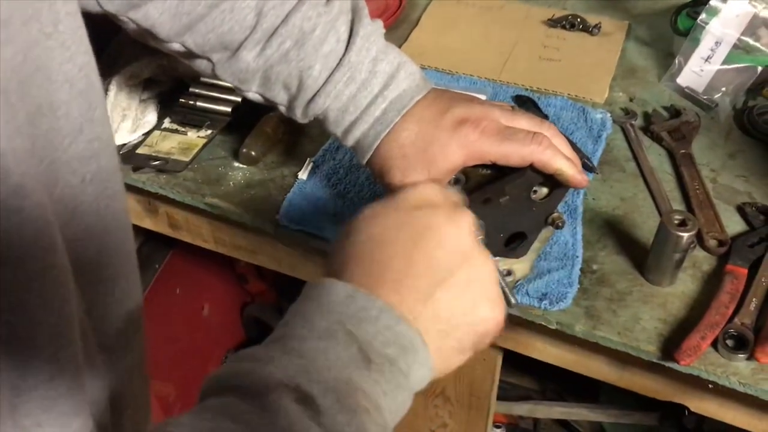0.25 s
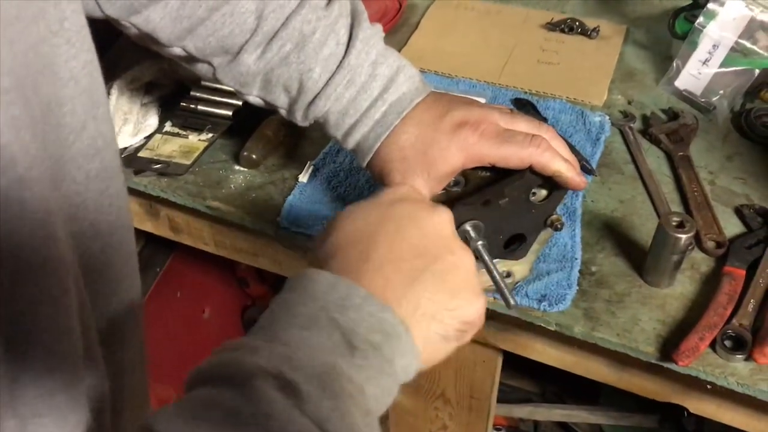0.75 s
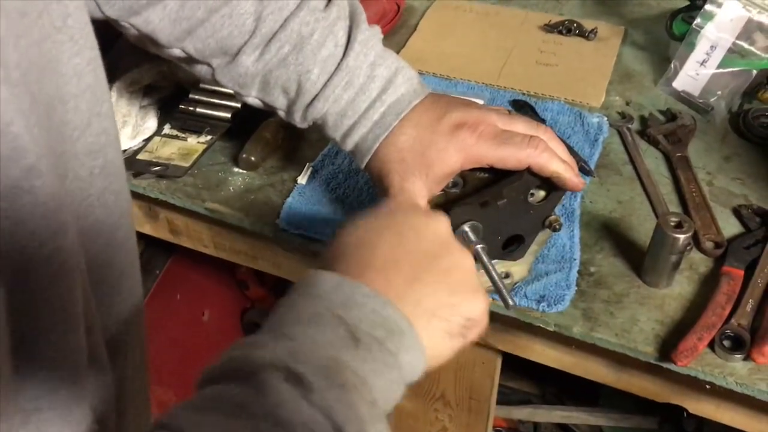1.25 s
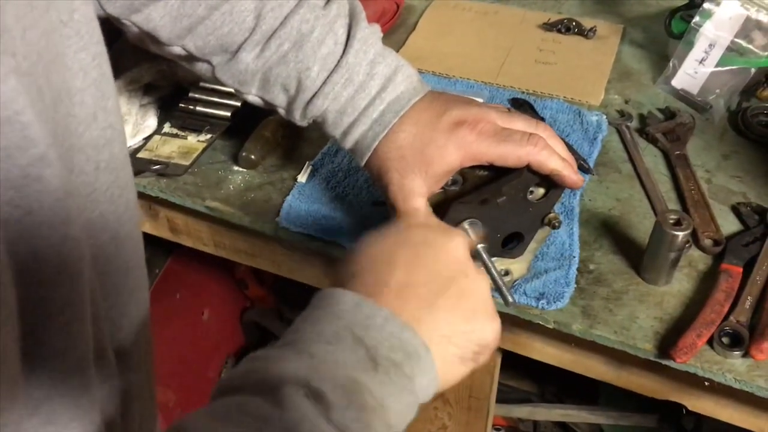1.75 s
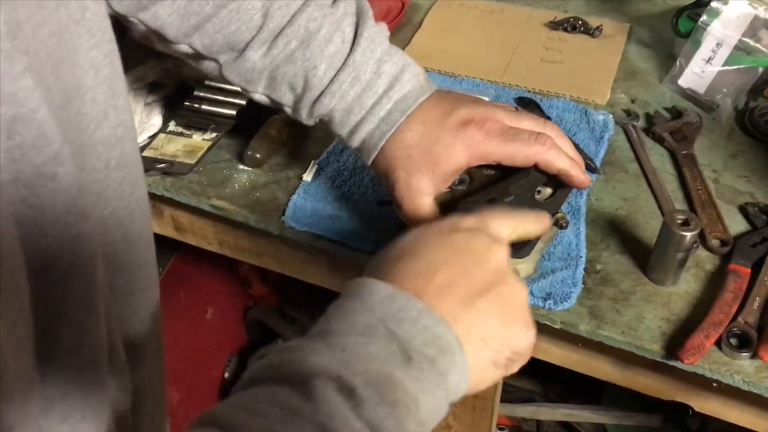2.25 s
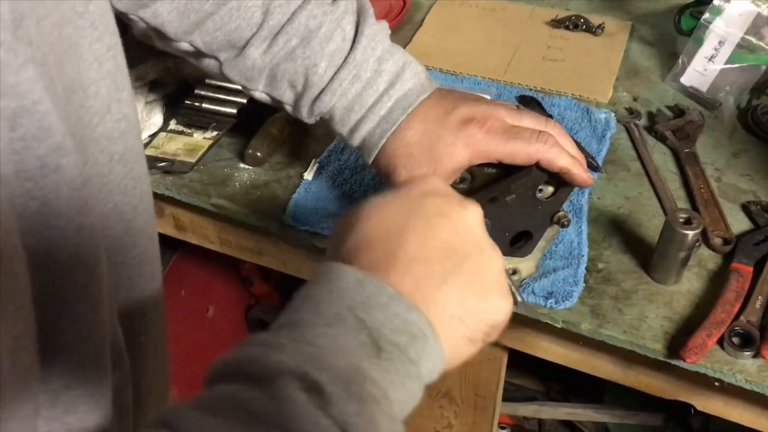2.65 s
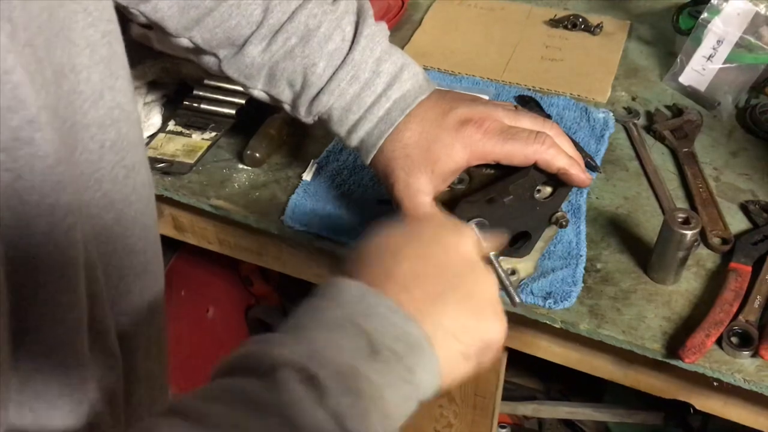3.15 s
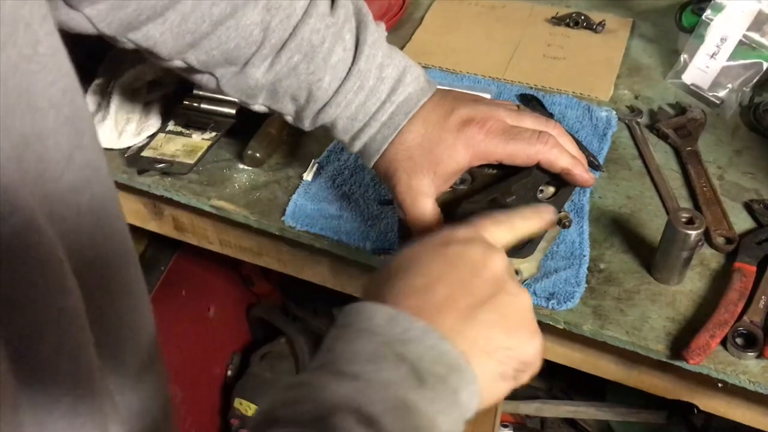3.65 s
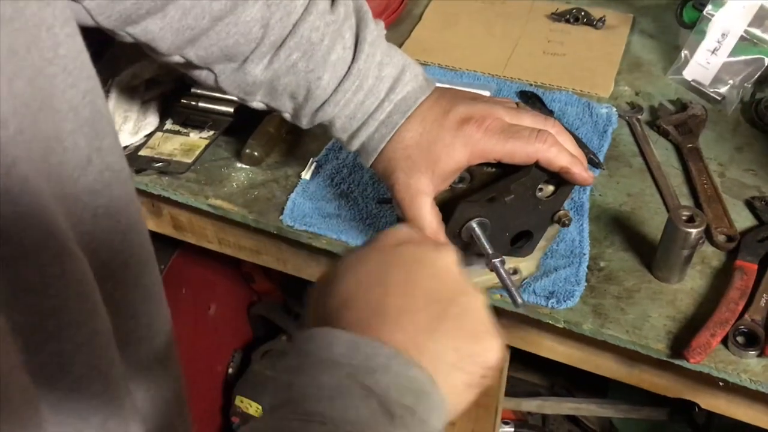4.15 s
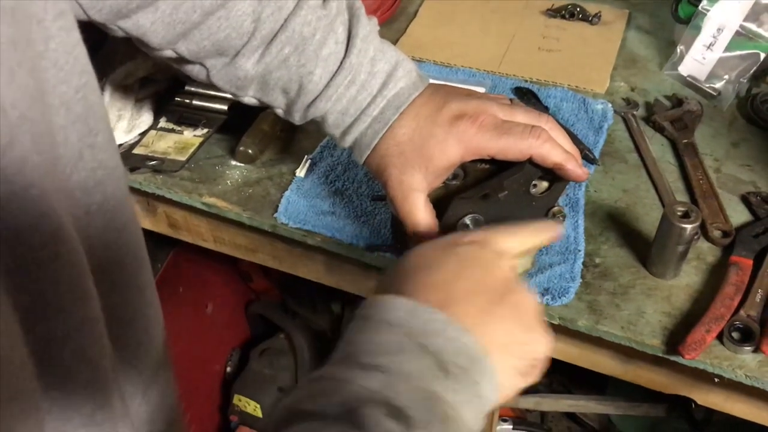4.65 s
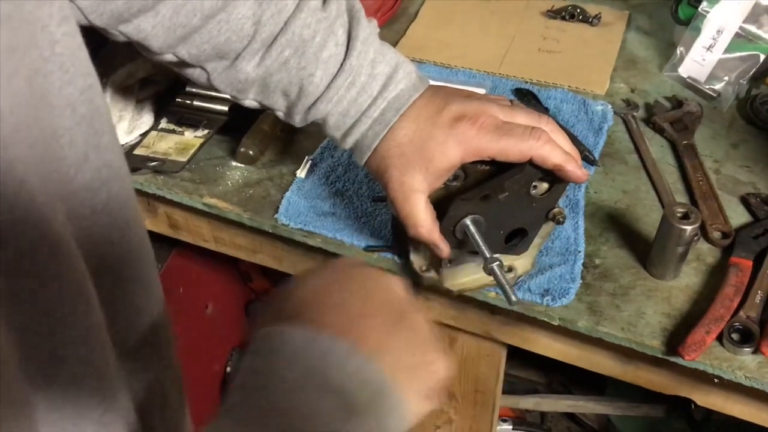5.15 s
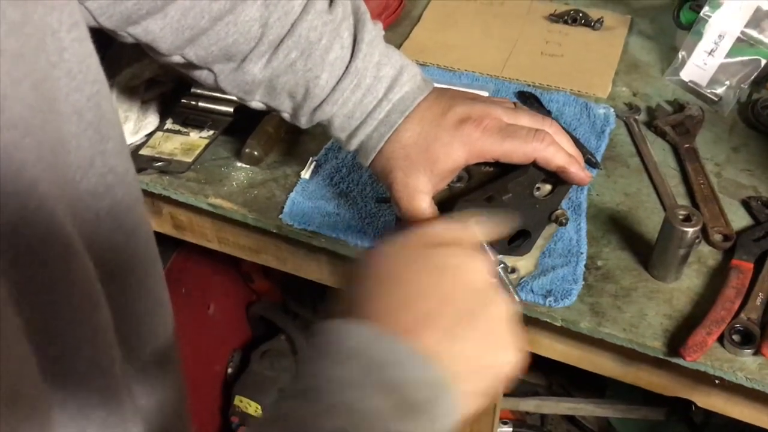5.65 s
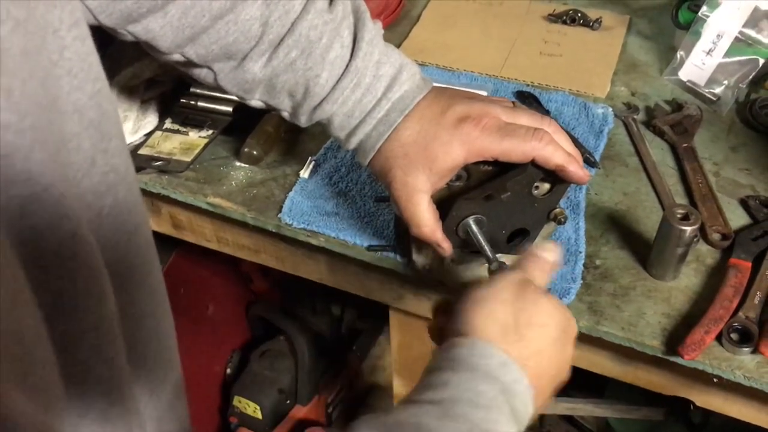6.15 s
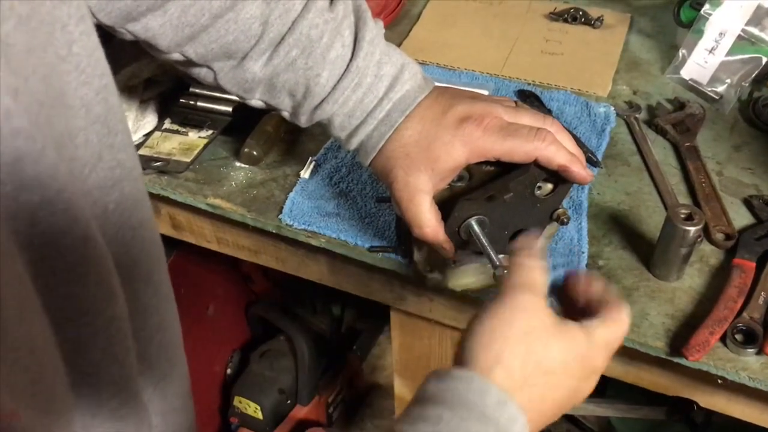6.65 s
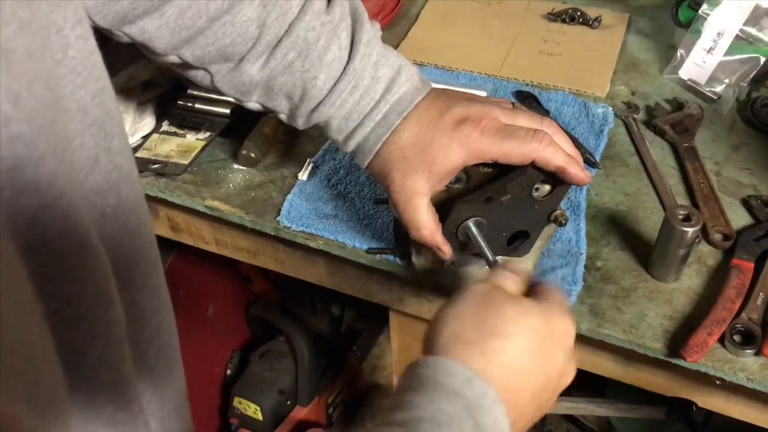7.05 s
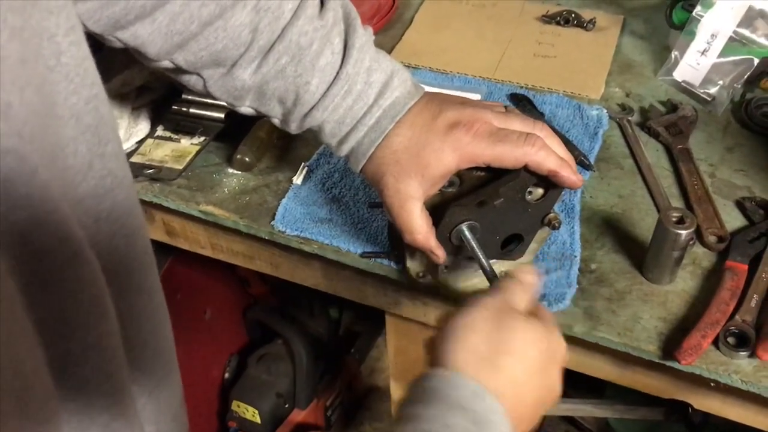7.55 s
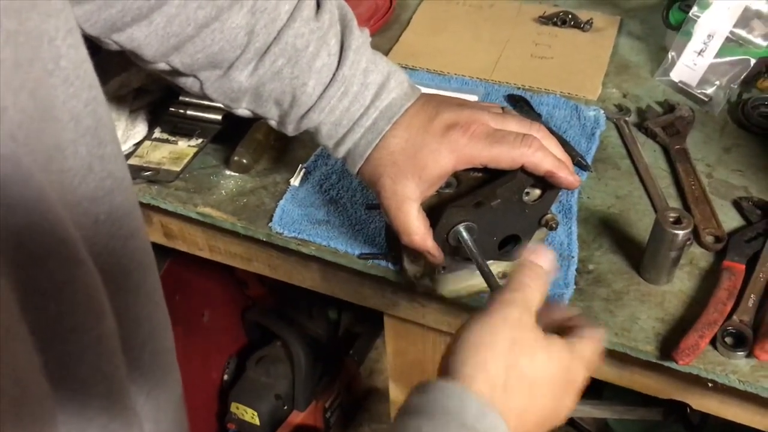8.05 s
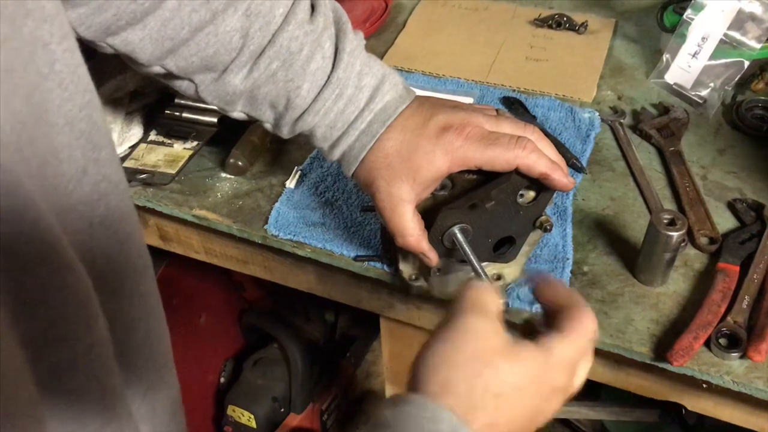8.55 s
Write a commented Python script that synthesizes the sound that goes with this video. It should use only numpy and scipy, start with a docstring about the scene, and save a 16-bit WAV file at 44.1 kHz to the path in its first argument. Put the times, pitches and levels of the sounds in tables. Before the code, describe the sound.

A finger flicks a loose nut along a threaded steel rod throughout, close by, about three times a second. Each stroke makes a faint thread scrape and a soft, low shake of the wooden workbench, followed by a sharp, bright metal click with a very short ring. The clicks are strong and even from the start until about 7 seconds. A small loose part clinks lightly a few times between 0.7 and 1.8 seconds, and a pin gives a faint ping near 2.8 and 5.3 seconds. Skin brushes the wood faintly between 3 and 4 seconds, ending in a soft thud of the hand. From about 6.3 seconds fingertip ticks join in, and after 7 seconds the knocks become weaker, looser rattles that continue until nearly 9 seconds. A quiet workshop hum and hiss lie underneath, with little echo.

```python
"""A loose nut knocks and rattles along a threaded steel rod as a finger flicks it.
The rod stands in a casting (a block of cast metal) on a wooden workbench. Each flick shakes the
bench and scrapes the thread, then the nut hits the rod and the metal rings. Now and then a small
loose part clinks, a pin rings or skin brushes the wood. A quiet workshop hums and hisses behind."""
import sys
import numpy as np
from scipy import signal
from scipy.fft import rfft, irfft
from scipy.io import wavfile

SR = 44100
rng = np.random.default_rng(int(sys.argv[2]) if len(sys.argv) > 2 else 0)


def file_out(sig):
    """Save sig as 16-bit WAV at sys.argv[1]."""
    # one column per channel
    cols = np.atleast_2d(sig).T
    # limit, then scale
    lim = np.clip(cols, -1, 1)
    pcm = np.round(lim * 32767).astype(np.int16)
    wavfile.write(sys.argv[1], SR, pcm)


N = 388080

# In all tables, levels are relative and decay_s is the time a sound takes to fade by 60 dB.
# Finger strokes: start_s, bench_shake_db, length_s, thread_scrape_db
FINGER_FLICKS = [(0.17, -51.5, 0.18, -66.5), (0.478, -48.5, 0.086, -62), (0.757, -49.5, 0.11, -65),
                 (1.045, -47.5, 0.091, -54), (1.31, -47, 0.089, -63), (1.59, -46, 0.07, -57),
                 (1.816, -48, 0.094, -62), (2.099, -45.5, 0.091, -67), (2.407, -45, 0.076, -59),
                 (2.671, -45, 0.089, -64), (2.947, -44.5, 0.081, -62.5), (3.222, -45.5, 0.11, -64),
                 (3.504, -45, 0.11, -64.5), (3.811, -44, 0.076, -63.5), (4.128, -46.5, 0.09, -61),
                 (4.453, -45.5, 0.095, -59.5), (4.749, -47.5, 0.18, -66.5), (5.177, -46.5, 0.1, -57),
                 (5.495, -46.5, 0.14, -68), (5.857, -47, 0.11, -59), (6.318, -46.5, 0.11, -62),
                 (6.603, -46, 0.1, -68), (6.897, -44, 0.099, -59), (7.142, -43.5, 0.11, -74),
                 (7.434, -49.5, 0.11, -53.5), (7.688, -48, 0.061, -57), (7.961, -49.5, 0.095, -61.5),
                 (8.253, -49.5, 0.096, -57.5), (8.525, -51.5, 0.11, -55.5)]
# How strongly each part answers as the nut travels along: time_s, casting_db, nut_db, bench_rocking_db
NUT_TRAVEL = [(0, -3, -9.5, -4), (0.9, -1, -8, -6.5), (1.7, -4, -8.5, -5), (2.3, 2.5, -3, -5),
              (3.8, -0.5, -9, -3), (4.5, -7.5, -9, -1), (5.6, -8, -7.5, -2), (6.2, -7, -7, -2.5),
              (7.4, -11, -13.5, 1), (8.8, -2, -12.5, 3.5)]


def from_db(db):
    return 10 ** (np.asarray(db) / 20)


def unit_level(x):
    return x / np.sqrt(np.mean(x ** 2) + 1e-20)


def curves(rows):
    """Turn rows of (time_s, values...) into one gliding curve per value."""
    times, *columns = np.transpose(rows)
    return [np.interp(np.arange(N) / SR, times, column) for column in columns]


def latest_hit(times):
    """For every sample, the number of the latest hit, switching 4 ms early."""
    return np.clip(np.searchsorted(times, np.arange(N) / SR + .004) - 1, 0, None)


def band(x, low_hz, high_hz):
    return signal.sosfilt(signal.butter(2, [low_hz, high_hz], "band", fs=SR, output="sos"), x)


def ring(clicks, pitch_hz, decay_s):
    """Each click starts a pure tone that dies away."""
    fade = from_db(-60 / (decay_s * SR))
    angle = 2 * np.pi * pitch_hz / SR
    return signal.lfilter([0, np.sin(angle)], [1, -2 * fade * np.cos(angle), fade * fade], clicks + 1e-18)


def contacts(per_s, spread_db):
    """Tiny random clicks of uneven size, as when rough surfaces touch."""
    sizes = from_db(spread_db * np.minimum(rng.exponential(1, N), 4)) * rng.choice([-1, 1], N)
    return unit_level(sizes * (rng.random(N) < per_s / SR))


def rattles(times, levels_db, decay_s, build_s, grains, click_db, tail_db):
    """Contacts crowd up to a sharp click, then die away as the parts keep trembling a little."""
    out = np.zeros(N)
    for time, db, decay, build in np.broadcast(times, levels_db, decay_s, build_s):
        hit = round(time * SR)
        i = np.arange(max(hit - SR // 10, 0), min(hit + SR // 4, N))
        age = i / SR - time - .5 * build
        rising_db = 20 * age / max(build, .0002)
        falling_db = -60 * (np.abs(age) / max(decay, .003)) ** 1.08
        trembling = from_db(tail_db - 60 * age / 0.071) * (age > 0)
        out[i] += grains[i] * from_db(db) * (from_db(np.where(age > 0, falling_db, rising_db)) + trembling)
        out[hit] += from_db(db + click_db)
    return out


def struck_metal(force, hit, tones, scatter_db):
    """Every hit lands somewhere else, so it wakes each tone with a strength of its own."""
    strength = from_db(scatter_db * rng.standard_normal((hit.max() + 1, len(tones))))
    return sum((-1) ** k * from_db(db) * ring(force * strength[hit, k], hz, decay)
               for k, (hz, db, decay) in enumerate(tones))


def finger_force(levels_db, rise_s, tail_s, peak_share, onset_db):
    """The push of each flick sets in, swells to a peak and lets go."""
    out = np.zeros(N)
    for (start, _, length, _), db in zip(FINGER_FLICKS, levels_db):
        corners = start + rise_s + np.array([-rise_s, 0, peak_share * length, length, length + tail_s])
        i = np.arange(round(start * SR), min(round(corners[-1] * SR), N))
        out[i] += from_db(db + np.interp(i / SR, corners, [-40, onset_db, 0, -7, -40]))
    return out


def workshop_air():
    """Rumble and hiss swell now and then, while a finer treble hiss rises or dips."""
    # Tone colour of the background noise: pitch_hz, level_db
    colour = [(18, -36.5), (30, 0), (64, 7.5), (189, -5), (259, 3.5), (461, -10.5), (1190, -14),
              (2170, -16), (3770, -19.5), (6210, -21.5), (8740, -26), (10200, -31), (16000, -28.5)]
    # Louder stretches: start_s, end_s, fade_s, rise_db, treble_change_db
    swells = [(2.493, 2.82, 0.063, 5, 12.5), (3.394, 3.88, .2, 4, -12.5), (4.194, 5.478, 0.3, 5, 12.5)]
    air_db, treble_db = -72, -81
    t = np.arange(N) / SR
    for start, end, fade, rise_db, treble_change_db in swells:
        share = np.clip(np.minimum(t - start, end - t) / fade + 1, 0, 1)
        air_db += share * rise_db
        treble_db += share * treble_change_db
    hz, db = np.transpose(colour)
    shape_db = np.interp(np.log(np.fft.rfftfreq(N, 1 / SR) + 1), np.log(hz), db)
    air = irfft(rfft(rng.standard_normal(N)) * from_db(shape_db), N)
    treble = unit_level(band(rng.standard_normal(N), 3500, 14000))
    return air / np.std(band(air, 560, 3000)) * from_db(air_db) + treble * from_db(treble_db)


def room_echo(sound, decay_s):
    """Dense echoes from the walls set in quickly and die away."""
    age = np.arange(SR // 2) / SR
    echo = rng.standard_normal(len(age)) * from_db(-60 * age / decay_s) * np.clip(age / 0.016, 0, 1)
    echo = signal.lfilter([1], [1, -.4], echo)   # walls and air swallow some treble
    return signal.fftconvolve(sound, echo / np.sqrt(np.sum(echo ** 2)))[:N]


def skin_scuffs():
    """Skin rubbing over wood makes short, dull puffs of noise."""
    # Brushes of the hand: time_s, level_db
    brushes = [(3.067, -47.5), (3.385, -48.5), (3.814, -43.5), (4.045, -39), (7.74, -40.5)]
    times, levels_db = np.transpose(brushes)
    rubbing = rattles(times, levels_db, decay_s=0.18, build_s=0.008, grains=rng.standard_normal(N),
                      click_db=-29, tail_db=-52)
    return band(rubbing, 360, 3600)


def workbench():
    """The rough push of the finger shakes the board's low tones, the upper ones late; a hand thuds."""
    # Tones of the wooden board: pitch_hz, width_hz, level_db
    wood_tones = [(58, 4.7, -30), (71.3, 15.5, -2.5), (103.5, 9.3, -17), (168.6, 24.5, -6),
                  (244.5, 11, -0.5), (265.9, 14, 8.5), (349.5, 11, 6.5), (375, 45, -5.5)]
    # The hand lands on the bench: time_s, level_db
    thuds = [(4.046, -37)]
    rough = contacts(600, spread_db=2)
    push_db = np.transpose(FINGER_FLICKS)[1] - 14
    push = rough * finger_force(push_db, rise_s=0.0049, tail_s=0.19, peak_share=0.97, onset_db=-5.5)
    late = rough * finger_force(push_db, rise_s=0.0035, tail_s=0.16, peak_share=0.85, onset_db=-21.5)
    rocking = push * from_db(curves(NUT_TRAVEL)[2] + 10.5)   # the whole bench rocks on its legs
    shaking, thud = np.zeros((2, N))
    for hz, width_hz, db in wood_tones:
        force = rocking if hz < 200 else push if hz < 300 else late
        decay_s = np.log(1000) / (np.pi * width_hz)   # a narrow tone rings longer
        shaking += from_db(db - 31) * np.sqrt(width_hz) * ring(force, hz, decay_s)
    for time, db in thuds:
        thud[round(time * SR)] = from_db(db)
    return band(shaking, 45, 400) + ring(thud, 150, decay_s=0.12) + ring(thud, 105, decay_s=0.22)


def steel_pin():
    """A nudged pin chatters briefly and rings, brighter the harder it lands."""
    # Nudges of the pin: time_s, level_db
    nudges = [(2.7763, -37), (5.2791, -26)]
    # Tones of the pin: pitch_hz, level_db, decay_s
    pin_tones = [(1324, -20, .03), (2980, -3, 0.08), (4300, 0, 0.047), (5760, -5, 0.06), (7900, -8, .012),
                 (9520, 0.5, 0.013), (11800, -4, 0.013), (15800, -1.5, 0.027)]
    times, levels_db = np.transpose(nudges)
    force = rattles(times, levels_db - 24.5, decay_s=0.014, build_s=0, grains=contacts(6000, spread_db=3),
                    click_db=14, tail_db=-30)
    hardness = from_db(levels_db - levels_db.max())[latest_hit(times)]
    bright = signal.lfilter([1, -.5], [1], force * hardness)
    ringing = sum(from_db(db) * ring(force if hz < 4000 else bright, hz, decay)
                  for hz, db, decay in pin_tones)
    return ringing + from_db(25) * band(bright, 3500, 16000)


def loose_part():
    """A light piece of metal chatters when jolted; thin contacts favour its higher tones."""
    # Jolts of the part: time_s, level_db, decay_s, brightness_db_per_octave
    clinks = [(0.6937, -37, 0.055, 0), (0.754, -51, 0.037, 7.5), (1.2441, -30, 0.072, 3.5),
              (1.263, -29.5, 0.058, 0), (1.5574, -42.5, 0.032, -1), (1.7866, -21, 0.014, 0.5)]
    # Tones of the part: pitch_hz, level_db, decay_s
    part_tones = [(1130, -19, 0.011), (1364, -0.5, 0.031), (2150, -9.5, 0.049), (3040, 1, 0.032),
                  (4270, -22, 0.038), (4900, -24, .02), (5353, -5, 0.02), (6330, 0, 0.022),
                  (9500, 1.5, 0.0053)]
    times, levels_db, decay_s, brightness = np.transpose(clinks)
    force = rattles(times, levels_db - 32, decay_s, build_s=0, grains=contacts(2500, spread_db=3),
                    click_db=12.5, tail_db=-16.5)
    hit = latest_hit(times)
    ringing = np.zeros(N)
    for tone in part_tones:
        octaves = np.log2(tone[0] / 3000)
        ringing += struck_metal(force * from_db(brightness * octaves)[hit], hit, [tone], scatter_db=2)
    return ringing + from_db(18) * band(force * from_db(brightness)[hit], 2100, 20000)


def nut_on_rod():
    """Knocks and the scraping thread make rod, nut and casting ring, with a sharp crack on top."""
    # The nut hits the rod: time_s, level_db, decay_s
    knocks = [(0.214, -34.5, 0.085), (0.231, -24, 0.013), (0.27, -35, .04), (0.2937, -8, 0.037),
              (0.5044, -30.5, 0.11), (0.5204, -4.5, 0.046), (0.7995, -27.5, 0.052), (0.821, -12.5, 0.018),
              (0.8344, -14.5, 0.01), (1.0953, -5, 0.041), (1.361, -7.5, 0.054), (1.627, -4, 0.037),
              (1.8736, -9.5, 0.036), (2.166, -6.5, 0.042), (2.4489, -5.5, 0.033), (2.7232, -6, 0.04),
              (2.9943, -4, 0.023), (3.018, -30, .02), (3.269, -21, 0.01), (3.2786, -4, 0.044),
              (3.327, -33, 0.015), (3.575, -4.5, 0.033), (3.858, -7.5, .031), (4.1849, -1, 0.027),
              (4.204, -32, .02), (4.5015, -25, .05), (4.5091, -2, 0.035), (4.843, -27.5, 0.12),
              (4.868, -3.5, 0.026), (5.2227, 0, 0.029), (5.5782, -27, .045), (5.5935, -4.5, 0.033),
              (5.9215, -4.5, 0.036), (6.3429, -21.5, 0.021), (6.366, -14.5, 0.0072), (6.3896, -5.5, .04),
              (6.6338, -24.5, 0.057), (6.655, -29, 0.018), (6.666, -8.5, 0.035), (6.911, -25.5, 0.043),
              (6.9505, -9.5, 0.057), (6.966, -22, .05), (7.206, -13, .08), (7.2227, -22.5, .05),
              (7.448, -26.5, 0.15), (7.478, -20, .03), (7.5044, -42, 0.039), (7.523, -21.5, .031),
              (7.7084, -26, 0.074), (7.72, -25, 0.029), (7.7519, -20, 0.081), (7.996, -26.5, 0.067),
              (8.0083, -24, 0.055), (8.022, -33, 0.028), (8.038, -33, 0.037), (8.2658, -22.5, 0.12),
              (8.2908, -19, 0.034), (8.305, -20, 0.019), (8.3376, -43, .025), (8.545, -32, .05),
              (8.5691, -15.5, 0.042), (8.6097, -15, 0.045), (8.6246, -21, 0.019)]
    # The fingertip taps the nut with one sharp tick: time_s, level_db
    taps = [(0.16, -46), (1.04, -48), (1.311, -39), (1.5288, -32.5), (2.1041, -33), (2.3989, -34),
            (2.676, -36), (2.949, -37), (3.221, -50), (4.7454, -26), (6.2743, -17), (6.5775, -27),
            (6.8688, -12), (7.1365, -14.5), (7.181, -8.5), (7.4006, -13.5), (7.5604, -38), (7.6712, -22.5),
            (8.2159, -30), (8.4977, -22.5), (8.7742, -17.5)]
    # Tones of the rod, the nut and the casting: pitch_hz, level_db, decay_s
    rod_tones = [(4100, -31, 0.054), (4977, -33, 0.073), (5727, -5, 0.0071), (5907, -4.5, 0.0049),
                 (6354, -4, 0.0078), (6750, -8.5, 0.0073), (7320, -9.5, 0.01), (7820, -11, 0.014),
                 (8498, -2, 0.0065), (8410, 2.5, 0.0037), (8946, -8, 0.0073)]
    nut_tones = [(11100, -4, .003), (11840, -3, .006), (13030, -2, .004), (14300, -4, .002),
                 (15730, -8, .008)]
    casting_tones = [(1418, -16, 0.04), (1813, 1, 0.0079), (2012, -4, 0.027), (2205, -4.5, .03),
                     (3256, -13, 0.03)]
    tap_decay_s = 0.0083
    # A weak knock builds up more slowly; a tap starts at once.
    hits = [(time, db, decay, 0.0033 - 0.00012 * db) for time, db, decay in knocks]
    hits += [(time, db, tap_decay_s, 0) for time, db in taps]
    times, levels_db, decay_s, build_s = np.transpose(sorted(hits))
    knocking = rattles(times, levels_db - 27.5, decay_s, build_s, grains=contacts(5000, spread_db=4),
                       click_db=15, tail_db=-16.5)
    scrape_db = np.transpose(FINGER_FLICKS)[3]
    push = finger_force(scrape_db, rise_s=0.011, tail_s=0.03, peak_share=0.4, onset_db=-18)
    force = knocking + push * contacts(14000, spread_db=6)
    hit = latest_hit(times)
    casting_db, nut_db, _ = curves(NUT_TRAVEL)
    bright = force * from_db(nut_db - 1.5)
    # Hard knocks give the casting a smaller share, so they sound brighter.
    dull = force * from_db(casting_db - 25.5 - 0.46 * np.maximum(levels_db[hit], -30))
    rod = from_db(-2) * struck_metal(force, hit, rod_tones, scatter_db=2.5)
    nut = struck_metal(bright, hit, nut_tones, scatter_db=3)
    casting = struck_metal(dull, hit, casting_tones, scatter_db=1.5)
    crack = from_db(14.5) * band(force, 5536, 9350) + from_db(-9) * band(force, 3800, 4500)
    crack += from_db(13.5) * band(bright, 10500, 20000) + from_db(18.5) * band(dull, 680, 6200)
    return rod + nut + casting + crack


def scene():
    """The metal and its echo join the bench, the hand and the workshop air in one channel."""
    metal = nut_on_rod() + loose_part() + steel_pin()
    echo = from_db(-16.5) * room_echo(metal, decay_s=0.21)
    return (metal + echo + workbench() + skin_scuffs() + workshop_air())[None]


def record(dry):
    """A small microphone loses the deepest bass and the highest treble."""
    dry = signal.sosfilt(signal.butter(4, 42, "high", fs=SR, output="sos"), dry)
    return signal.sosfilt(signal.cheby2(14, 60, 16600, fs=SR, output="sos"), dry)


dry = scene()
out = record(dry)
file_out(out)
```